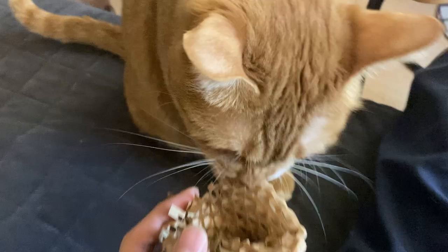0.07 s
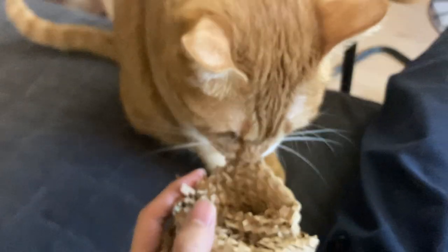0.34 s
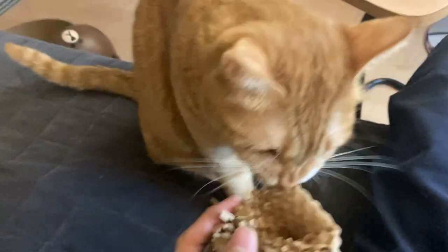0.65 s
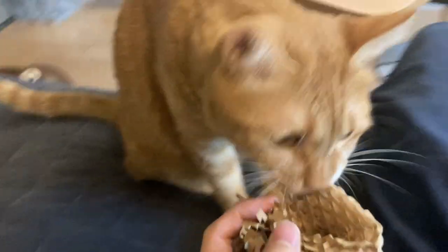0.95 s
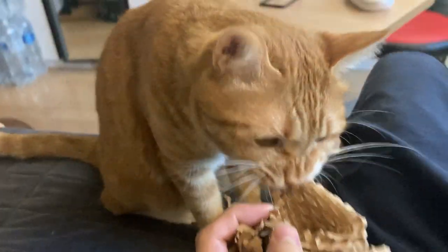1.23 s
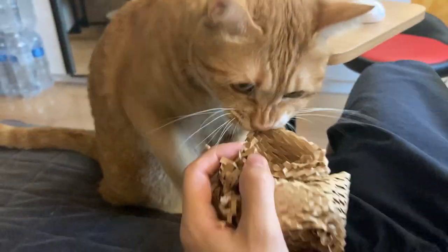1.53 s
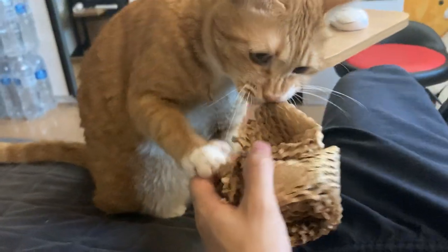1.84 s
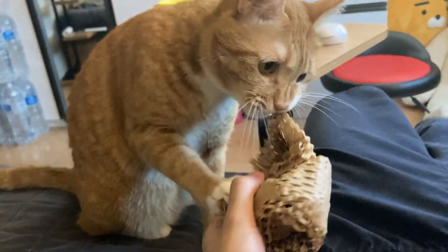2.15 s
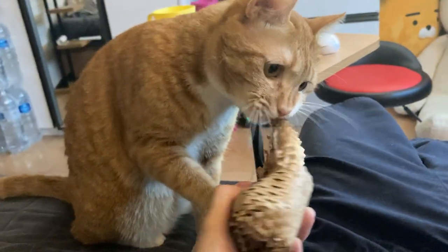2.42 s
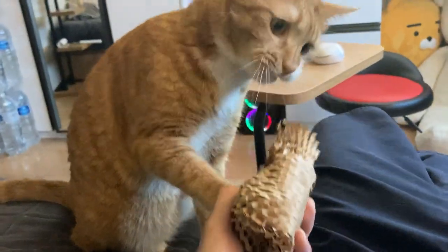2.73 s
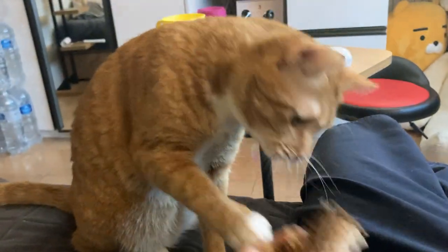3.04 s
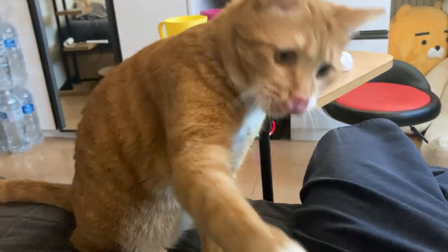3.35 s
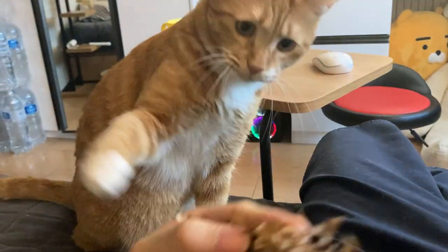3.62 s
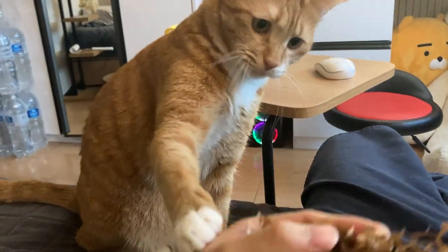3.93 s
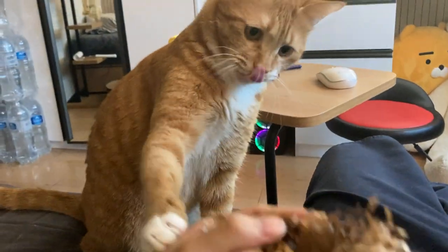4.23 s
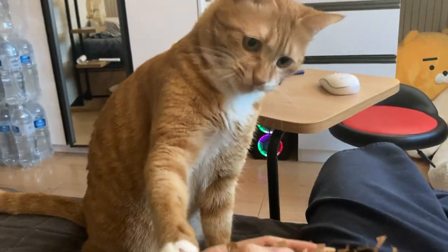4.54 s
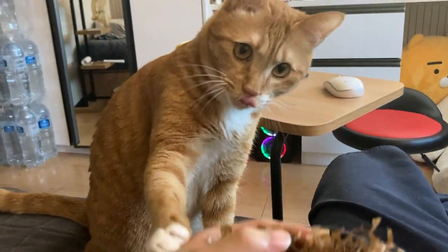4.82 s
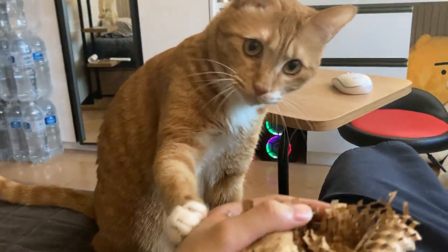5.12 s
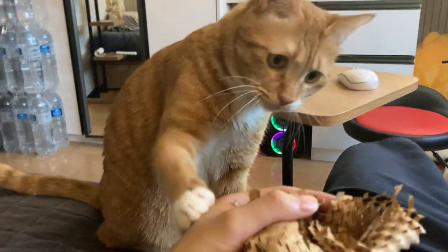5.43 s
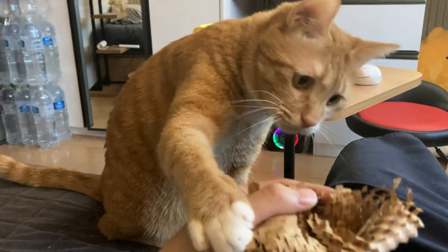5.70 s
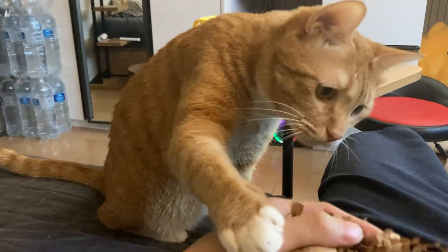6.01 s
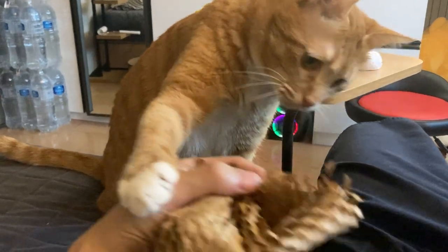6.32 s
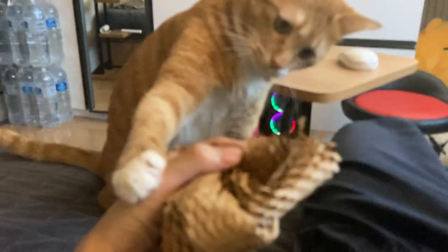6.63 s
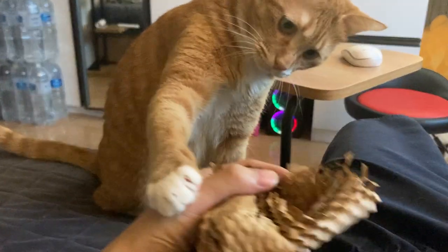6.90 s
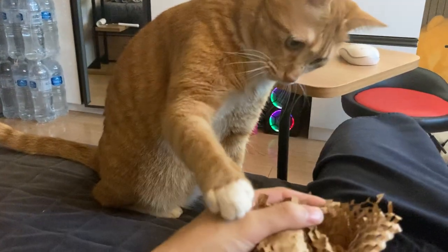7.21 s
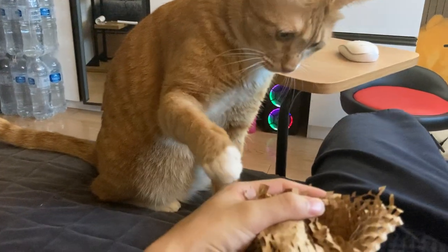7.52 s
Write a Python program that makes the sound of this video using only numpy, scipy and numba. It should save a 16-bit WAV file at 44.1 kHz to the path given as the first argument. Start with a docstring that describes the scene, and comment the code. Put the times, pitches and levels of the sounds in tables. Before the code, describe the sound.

A cat bites and tugs a hand-held roll of stiff honeycomb packing paper, close to the microphone in a small furnished room. Soft rustles build into dense, dry crackling with sharp snaps and short rips. The paper thins to faint ticks, pauses briefly, then crinkles again with a few soft, dull bumps. A low appliance hum continues throughout.

```python
"""Stiff paper rustles softly, then crackles, over a low hum in a small room.
A cat is biting, tugging and pawing at a hand-held roll of honeycomb packing paper, close to a phone.
Each squeeze sets off a swarm of tiny creases, a scrape of the layers and a lower crunch; single paper
cells buckle in sharp snaps or tear in short rips. A few soft bumps land, most of them near the end.
An appliance hums throughout, at twice the frequency of the mains power."""
import sys
import numpy as np
from scipy import signal
from scipy.fft import rfft, irfft
from scipy.io import wavfile
from scipy.ndimage import map_coordinates
from numba import njit

SR = 44100
rng = np.random.default_rng(int(sys.argv[2]) if len(sys.argv) > 2 else 0)


def output_pcm(signal):
    """Save a mono or channel-first signal as 16-bit PCM at the path in sys.argv[1].

    Samples are clipped to [-1, 1] before scaling.
    """
    pcm = np.clip(np.atleast_2d(signal).T, -1, 1) * 32767
    wavfile.write(sys.argv[1], SR, np.round(pcm).astype(np.int16))


N = 342216
TIME = np.arange(N) / SR

# each bite, tug or shift of the grip: (start [s], hold [s], effort [dB], offset for the crunch [dB])
SQUEEZES = [(0.035, 0.037, -71, -2.5), (.115, 0.032, -62.5, -27), (0.376, 0.18, -68, -10),
            (0.591, 0.024, -63, -10), (.675, 0.04, -57, -12), (0.76, 0.12, -67, -5), (.96, 0.034, -65, -6),
            (1.04, 0.14, -53, -9.5), (1.222, .11, -55, -12), (1.366, .11, -48, -13.5),
            (1.511, .06, -55, -9.5), (1.656, 0.037, -55, -9), (1.719, 0.14, -47, -14),
            (1.87, 0.075, -38.5, -13), (2.116, 0.073, -57, -12), (2.23, 0.018, -47, -13),
            (2.41, 0.14, -54, -13), (2.55, 0.17, -49, -16.5), (2.738, 0.013, -47, -11.5),
            (2.799, 0.14, -61, -13), (2.974, 0.041, -57, -14.5), (3.069, 0.03, -50, -18.5),
            (3.145, 0.068, -43.5, -13), (3.26, .05, -48, -17), (3.33, .06, -47.5, -15),
            (3.432, .03, -42, -15), (3.48, 0.03, -52, -16), (3.82, 0.1, -62, -9.5), (3.95, .04, -62, -9.5),
            (4.03, 0.065, -66, -8.5), (4.19, 0.029, -71, -11), (4.414, 0.0437, -67.5, -6),
            (4.628, 0.046, -73.5, -11), (4.781, 0.043, -76.5, -9), (4.955, 0.03, -66.5, -8.5),
            (6.071, .025, -60.5, -16), (6.25, .035, -55, -18), (6.3, 0.1, -49.5, -16),
            (6.519, 0.091, -65, -11.5), (6.67, 0.034, -70, -9.5), (6.86, 0.1, -66, -8),
            (6.99, .09, -54, -12), (7.133, 0.023, -50, -11), (7.223, 0.2, -67, -7)]
# the harder the squeeze, the more creases: (effort [dB], creases [1/s])
CREASE_RATE = [(-75, 100), (-58, 210), (-48, 450), (-38, 1400)]
# tone of the rustle: (frequency [Hz], level [dB])
RUSTLE_TONE = [(100, -34), (350, -14.5), (750, -14), (1500, -11.5), (3000, -12), (5500, -7), (9000, -1),
               (12000, -1.5), (15500, -7)]
# single cells buckling: (time [s], level [dB])
SNAPS = [(0.3728, -49), (0.433, -50), (0.6623, -49), (0.6745, -45.5), (0.741, -36), (0.7872, -42),
         (0.809, -42), (0.9516, -48), (0.9755, -45), (0.9938, -43.5), (1.009, -39.5), (1.0194, -35.5),
         (1.0415, -37), (1.0737, -36), (1.109, -37.5), (1.161, -40), (1.1659, -30), (1.1739, -34.5),
         (1.1798, -42), (1.196, -39), (1.224, -38.5), (1.2325, -44), (1.2841, -38.5), (1.3059, -46),
         (1.367, -35.5), (1.3806, -35), (1.387, -38.5), (1.408, -35), (1.425, -31), (1.472, -35),
         (1.5244, -41), (1.6256, -42), (1.7177, -36.5), (1.7947, -40), (1.8808, -37), (1.9302, -22.5),
         (2.1654, -38), (2.3547, -50), (2.3655, -37), (2.3677, -40), (2.3755, -44), (2.42, -42.5),
         (2.4712, -34.5), (2.4847, -39), (2.534, -39), (2.547, -41), (2.6147, -37.5), (2.636, -42),
         (2.662, -32.5), (2.6707, -35), (2.7404, -25), (2.872, -48), (2.923, -44), (2.9747, -47),
         (2.983, -42), (3.0237, -49), (3.0547, -37.5), (3.122, -37), (3.202, -42), (3.208, -39),
         (3.2318, -42), (3.252, -42), (3.332, -32), (3.369, -32), (3.389, -32), (3.4306, -31),
         (3.5537, -43.5), (3.618, -47.5), (3.83, -42), (3.8708, -50), (3.9441, -40), (3.98, -46),
         (3.9919, -47), (4.0, -49), (4.0515, -48.5), (4.083, -48.5), (4.1259, -52.5), (4.283, -52.5),
         (4.374, -53), (4.4191, -63), (4.4558, -55), (4.646, -58), (4.789, -54.5), (4.894, -54.5),
         (4.953, -50.5), (4.9623, -60), (4.976, -60), (5.0338, -51), (6.0761, -55), (6.0824, -47),
         (6.269, -43), (6.3074, -33.5), (6.392, -40), (6.4428, -36), (6.5153, -43.5), (6.566, -46),
         (6.5919, -45), (6.7627, -46), (6.9645, -36), (6.9752, -46), (6.986, -40), (7.0021, -39),
         (7.097, -48), (7.14, -38.5), (7.449, -46)]
# tone of a snap, fuller in the low treble than the rustle: (frequency [Hz], level [dB])
SNAP_TONE = [(200, -22.5), (1300, -10), (2600, -4), (5500, -3.5), (9500, -2.5), (15500, -3)]
# a run of cells tearing in one go: (time [s], length [s], level [dB])
RIPS = [(1.894, .003, -42), (1.9, 0.0038, -34), (2.214, 0.0053, -40.5), (2.228, 0.007, -36),
        (2.662, 0.0033, -27.5), (2.7381, 0.0097, -32), (3.432, .006, -41.5), (6.293, 0.002, -42.5),
        (6.307, 0.0025, -44), (6.371, 0.0081, -48.5)]
# how often larger folds give way: (at a light bend [1/s], at a hard bend [1/s])
FOLDS_PER_S = [130, 420]
# tone of those folds: (frequency [Hz], level [dB])
FOLD_TONE = [(60, -16), (350, -8), (700, -9), (1300, -9.5), (2200, -8.5), (4000, -4.5), (9000, -6.5)]
# a whole fold popping: (time [s], level [dB], pitch [Hz])
POPS = [(0.741, -45, 1490), (1.05, -39.5, 1300), (1.076, -49, 1980), (1.109, -45, 1450),
        (1.175, -45.5, 1680), (1.468, -42.5, 2000), (1.878, -41, 900), (1.934, -40, 931),
        (3.165, -45.5, 3700), (3.202, -41.5, 3950), (3.33, -39, 3460), (3.391, -49.5, 1825),
        (5.064, -59.5, 1670), (7.149, -49, 1200)]
# hard tugs that shake the whole roll: (start [s], hold [s], level [dB])
TUGS = [(1.715, .12, -67), (1.87, .08, -55.5), (2.22, .02, -64.5), (2.744, 0.013, -62), (7.14, .025, -63.5)]
# dull tone of the shaken roll: (frequency [Hz], level [dB])
TUG_TONE = [(80, -13), (200, 0), (350, -0.5), (750, -4.5), (1300, -17), (4000, -40.5)]
# air spaces between the rolled layers: (pitch [Hz], width [Hz], level [dB])
HOLLOWS = [(1450, 440, -3), (2615, 590, -6.5), (4340, 750, -0.5)]
# soft bumps on hand and cushion: (time [s], level [dB], pitch [Hz], fade time [s])
BUMPS = [(1.86, -46, 42.6, 0.037), (2.746, -52, 54.7, 0.026), (5.05, -60, 65, .04),
         (6.725, -44.5, 154.5, 0.023), (6.81, -40.5, 80, 0.019), (7.149, -56, 350, 0.011)]
# loudness of the appliance: (time [s], level [dB])
HUM_LEVEL = [(0.09, -46), (1.72, -47.5), (2.13, -51), (2.22, -49), (2.36, -52.5), (2.72, -50), (2.9, -51.5),
             (3.45, -49), (5.62, -45), (6.76, -46.5), (7.71, -49.5)]
# its hum, then its fan tones: (pitch [Hz], offset from the appliance's level [dB])
HUM_TONES = [(119.9, -1), (187, -30), (268, -32), (402, -37)]
# faint bands of background noise: (pitch [Hz], level [dB])
WHIRR_BANDS = [(430, -81), (860, -85.5), (1100, -89), (1400, -89)]
# tone of the low room noise: (frequency [Hz], level [dB])
LOW_AIR_TONE = [(22, -21.5), (55, -0.5), (110, 0), (200, -2), (330, -4.5), (480, -11.5), (700, -20.5),
                (1100, -22), (2000, -36), (4000, -42.5), (9000, -38), (16000, -56)]
# tone of the room noise that differs between left and right: (frequency [Hz], level [dB])
WIDE_AIR_TONE = [(25, -21.5), (60, -7), (200, -2), (330, -2), (500, 0), (750, -6), (1100, -7.5),
                 (1600, -19), (2500, -23.5), (5000, -33), (10000, -36), (16000, -41)]
# detours of the sound that bounces off hand, cat and leg: (extra path [m])
BOUNCE_PATHS = [.22, 0.898, 2.398, 3.1]
# how far the paper's sound is ahead at the left microphone: (frequency [Hz], phase lead [rad])
LEFT_LEAD = [(250, 0), (560, 3.0), (850, 4.2), (1300, 4.3), (2500, 3.7), (5300, 3.1), (8400, 6.3),
             (11900, 9.4), (15000, 12.6)]

# a squeeze builds up, then relaxes; the heavy roll settles more slowly than the loose edges
BUILD_DB_PER_S, RELAX_DB_PER_S, SETTLE_DB_PER_S = 519.5, 379.5, 260
RESTING_DB = -92.5  # paper lying still in the hand
CRACKLE_DB, SCRAPE_DB, CRUNCH_DB = -1.5, -5, 2
RIP_CELLS_PER_S, RIP_FALL_DB_PER_S = 2200, 4001.5
RING_GAIN, RING_SHARPNESS = 1.6, 4  # how a patch of paper rings


def paper():
    """Snaps and rips over scraping layers and tiny creases, which crowd together in a hard squeeze."""
    starts, holds, levels_db, _ = np.transpose(SQUEEZES)
    effort_db = effort(starts, holds, levels_db, RELAX_DB_PER_S)
    rate = np.interp(effort_db, *np.transpose(CREASE_RATE))
    scrape = unit(undb(3.5 * wander(110))) * rng.standard_normal(N)  # the layers catch and slip
    crackle = swarm(rate, low_hz=2800, high_hz=15300, decay_s=0.00049)
    rustle = rips() + undb(effort_db) * (undb(CRACKLE_DB) * crackle + undb(SCRAPE_DB) * scrape)
    return snaps() + hollows(shape_tone(rustle, RUSTLE_TONE))


def effort(starts, holds, levels_db, fall_db_per_s):
    """How hard the paper is worked, in dB: each squeeze builds up to its start, holds and falls away."""
    power = np.full(N, undb(RESTING_DB) ** 2)
    for start, hold, db in zip(starts, holds, levels_db):
        near = slice(max(int((start - .2) * SR), 0), int((start + hold + .5) * SR))
        age = TIME[near] - start
        before_db = BUILD_DB_PER_S * np.maximum(-age, 0)
        after_db = fall_db_per_s * np.maximum(age - hold, 0)
        power[near] += undb(db - before_db - after_db) ** 2
    return 10 * np.log10(power)


def creases(times, gains, ring_hz, decay_s, ring_gain=RING_GAIN, size=512):
    """Each crease is a crack that dies in a moment and makes its own patch of paper ring."""
    age = np.arange(size) / SR
    noise = rng.standard_normal((len(times), size + 1))
    decay = decay_s * 2 ** (noise[:, :1] / 2)  # each crack fades at its own speed
    flutter = .05 * np.exp(-age / .003)
    cracks = noise[:, 1:] * (np.exp(-age / decay) + flutter)
    hz, centre = np.fft.rfftfreq(size, 1 / SR) + 1, ring_hz[:, None]
    ring = ring_gain / (1 + 1j * RING_SHARPNESS * (hz / centre - centre / hz))
    cracks = irfft(rfft(cracks) * (1 + ring))
    strength = np.sqrt(np.sum(cracks ** 2, axis=1) * 1000 / SR)  # as if packed into one millisecond
    cracks *= (gains / strength)[:, None]
    places = (times * SR).astype(int)[:, None] + np.arange(size)
    return np.bincount(places.ravel(), cracks.ravel(), N + size)[:N]


def swarm(rate, low_hz, high_hz, decay_s, ring_gain=RING_GAIN):
    """Creases at random moments, about `rate` each second, many small and few large."""
    hits = np.flatnonzero(rng.random(N) < rate / SR)
    sizes = unit((.16 + rng.random(len(hits))) ** -.75)
    gains = sizes * np.sqrt(1000 / rate[hits])  # a denser swarm is no louder
    ring_hz = low_hz * (high_hz / low_hz) ** rng.random(len(hits))
    return creases(hits / SR, gains, ring_hz, decay_s, ring_gain)


def snaps():
    """Single cells buckle with a dry crack; the sheet around each gives a short, lower jolt."""
    times, db = np.transpose(SNAPS)
    ring_hz = 6000 * 2 ** (1.2 * rng.random(len(times)))
    jolts = creases(times, undb(db - 8), ring_hz / 3.6, decay_s=.0007)
    cracks = creases(times, undb(db), ring_hz, decay_s=.0006)
    return shape_tone(cracks + jolts, SNAP_TONE)


def rips():
    """Tears start at once, run through the cells as a tight burst of cracks and stop short."""
    gain = np.zeros(N)
    for start, length, db in RIPS:
        age = TIME - start
        fall_db = RIP_FALL_DB_PER_S * np.maximum(age - length, 0)
        gain += (age > 0) * undb(np.maximum(db - fall_db, -200))
    rate = np.where(gain > undb(-70), RIP_CELLS_PER_S, 1e-9)
    return gain * swarm(rate, low_hz=3500, high_hz=13000, decay_s=0.00092)


def crunch():
    """Larger folds give way with a lower, longer crunch, more of them the harder the roll bends."""
    starts, holds, levels_db, offsets_db = np.transpose(SQUEEZES)
    bend_db = effort(starts, holds, levels_db + offsets_db, SETTLE_DB_PER_S)
    rate = np.interp(bend_db, [-77, -57], FOLDS_PER_S)
    folds = swarm(rate, low_hz=1060, high_hz=3520, decay_s=0.00091, ring_gain=7.2)
    return undb(bend_db + CRUNCH_DB) * shape_tone(folds, FOLD_TONE)


def pops():
    """A whole fold gives way with a hollow pop, longer and lower than a snap."""
    times, db, hz = np.transpose(POPS)
    return shape_tone(creases(times, undb(db), hz, decay_s=0.0011, ring_gain=3.5), FOLD_TONE)


def tugs():
    """The whole roll flexes with a dull, low rumple when it is pulled hard."""
    pull_db = effort(*np.transpose(TUGS), SETTLE_DB_PER_S)
    rumple = unit(undb(5.8 * wander(90))) * rng.standard_normal(N)
    return undb(pull_db) * shape_tone(rumple, TUG_TONE)


def hollows(sound):
    """Air spaces in the roll ring along, drifting at random in pitch and strength."""
    out = sound
    for hz, width_hz, db in HOLLOWS:
        centre_hz = hz * np.exp(.1 * wander(12))
        gain = undb(db + 3 * wander(16))
        out = out + gain * resonate(sound + 1e-18, centre_hz, float(width_hz))
    return out


def bumps():
    """Soft knocks on hand and cushion: a thud that dies quickly, with a dull scuff."""
    out = np.zeros(N)
    for start, db, hz, decay_s in BUMPS:
        age = np.maximum(TIME - start, 0)
        thud = np.sin(2 * np.pi * hz * age)
        scuff = unit(muffle(rng.standard_normal(N), 2 * hz, order=4))
        rise_and_fade = (1 - np.exp(-age / 0.00018)) * np.exp(-age / decay_s)
        out += undb(db) * rise_and_fade * (thud + .5 * scuff)
    return out


def appliance():
    """A steady magnetic hum with a few faint, wavering fan tones."""
    (hum_hz, hum_db), *fan_tones = HUM_TONES
    out = undb(hum_db) * sine(hum_hz + 0.2 * wander(5.4))
    for hz, db in fan_tones:
        out += undb(db + 2 * wander(4.2)) * sine(hz + 2 * wander(8))
    return np.sqrt(2) * undb(curve(HUM_LEVEL) + .3 * wander(12)) * out


def whirr(width_hz=180., flicker_db=5):
    """Faint bands of background noise, each drifting in pitch and fading in and out on its own."""
    out = np.zeros(N)
    for hz, db in WHIRR_BANDS:
        gain = undb(db + flicker_db * wander(13))
        centre_hz = hz * np.exp(.06 * wander(7))
        band = resonate(rng.standard_normal(N), centre_hz, width_hz)
        out += gain * unit(resonate(band, centre_hz, width_hz))  # a second pass makes the edges steeper
    return out


def room_air(low_db=-66, wide_db=-67.5):
    """Soft, wavering room noise: a low part, and a wide part with opposite signs left and right."""
    low = undb(low_db + 1.5 * wander(12)) * shape_tone(rng.standard_normal(N), LOW_AIR_TONE)
    wide = undb(wide_db + 0.89 * wander(15)) * shape_tone(rng.standard_normal(N), WIDE_AIR_TONE)
    return low, wide * np.array([[1], [-1]])


def bounces(sound, level_db=-7, sway_m=0.078):
    """Dull echoes off nearby bodies; their paths to each microphone change as the roll moves."""
    dull = muffle(sound, above_hz=4480)
    out = np.zeros((2, N))
    for side in out:
        for metres in BOUNCE_PATHS:
            delay_s = (metres + sway_m * wander(6)) / 343  # sound travels 343 m/s
            side += map_coordinates(dull, [(TIME - delay_s) * SR], order=1)
    return undb(level_db) * out / np.sqrt(len(BOUNCE_PATHS))


def room_echo(sound, fade_s=0.28, level_db=-17, size=20000):
    """The blurred, dull echo of a small furnished room, different on each side."""
    age = np.arange(size) / SR
    tail = rng.standard_normal((2, size)) * undb(-60 * age / fade_s) * (1 - np.exp(-age / .004))
    tail /= np.sqrt(np.sum(tail ** 2) / 2)
    tail = muffle(tail, above_hz=7000)
    return undb(level_db) * signal.fftconvolve(sound[None], tail, axes=1)[:, :N]


def two_microphones(sound):
    """The left and right microphones hear a near sound at different moments."""
    lead = np.interp(np.fft.rfftfreq(N, 1 / SR), *np.transpose(LEFT_LEAD))
    return np.array([sound, irfft(rfft(sound) * np.exp(-1j * lead), N)])


def undb(db):
    """Turn decibels into a number to multiply by."""
    return 10 ** (np.asarray(db) / 20)


def unit(x):
    """Scale to an average power of 1."""
    return x / np.sqrt(np.mean(x ** 2))


def curve(rows):
    """Join (time [s], value) rows by straight lines."""
    return np.interp(TIME, *np.transpose(rows))


def wander(turns_per_s):
    """A random drift that strays about 1 either side of zero."""
    points = rng.standard_normal(4096)
    return 1.2 * np.interp(TIME * turns_per_s, np.arange(len(points)), points)


def sine(hz):
    """A pure tone that follows a moving pitch."""
    return np.sin(2 * np.pi * np.cumsum(hz) / SR)


def muffle(sound, above_hz, order=1):
    """Soften the highs; a higher order cuts more steeply."""
    return signal.sosfilt(signal.butter(order, above_hz, fs=SR, output="sos"), sound)


def shape_tone(sound, tone):
    """Filter by a tone table, scaled so that white noise keeps its power."""
    hz, db = np.transpose(tone)
    log_hz = np.log(np.fft.rfftfreq(N, 1 / SR) + 1)
    gain = unit(undb(np.interp(log_hz, np.log(hz), db)))
    # fold the filter forward in time, so it rings after a click and never before it
    cepstrum = irfft(np.log(gain), N)
    cepstrum[1:N // 2] *= 2
    cepstrum[N // 2 + 1:] = 0
    return irfft(rfft(sound) * np.exp(rfft(cepstrum)), N)


@njit
def resonate(sound, hz, width_hz):
    """Let through only a band around a moving pitch."""
    out, band_state, low_state = np.empty(len(sound)), 0., 0.
    for i in range(len(sound)):
        step, damping = np.tan(np.pi * hz[i] / SR), width_hz / hz[i]
        band = (band_state + step * (sound[i] - low_state)) / (1 + step * (step + damping))
        band_state = 2 * band - band_state
        low_state += 2 * step * band
        out[i] = damping * band
    return out


def scene():
    """The paper is close in front; hum, bumps and low room noise lean to the left."""
    crinkle = paper()
    roll = hollows(crunch()) + pops() + tugs()
    outgoing = crinkle + undb(8) * roll  # big folds send sound all around, so more of it comes back
    echoes = bounces(outgoing) + room_echo(outgoing)
    low_air, wide_air = room_air()
    scattered = undb(-8) * np.array([snaps(), snaps()])  # cells scatter each snap differently to each side
    direct = two_microphones(crinkle + roll + whirr())
    leaning_left = np.array([[1.25], [.75]]) * (appliance() + bumps() + low_air)
    return direct + scattered + echoes + leaning_left + wide_air


def record(dry, low_cut_hz=32, top_hz=16000):
    """The phone cuts the deepest rumble and the highest treble."""
    thin = signal.sosfilt(signal.butter(3, low_cut_hz, "highpass", fs=SR, output="sos"), dry)
    return signal.sosfilt(signal.ellip(8, .2, 70, top_hz, fs=SR, output="sos"), thin)


dry = scene()
out = record(dry)
output_pcm(out)
```